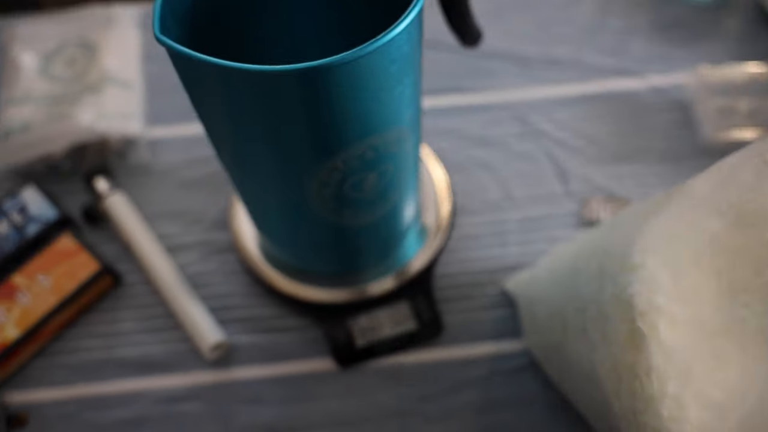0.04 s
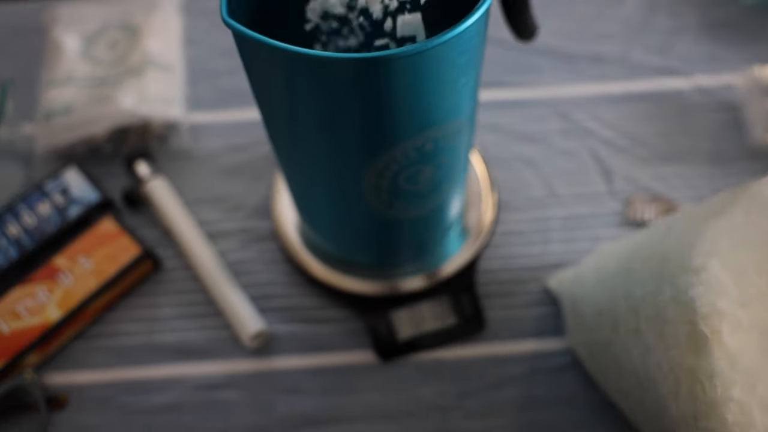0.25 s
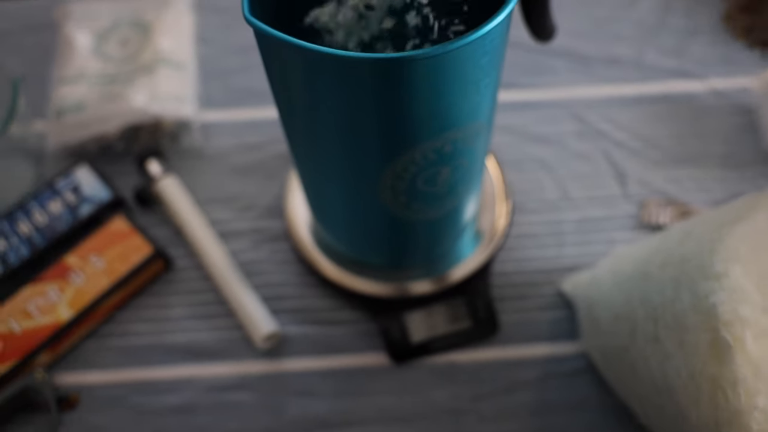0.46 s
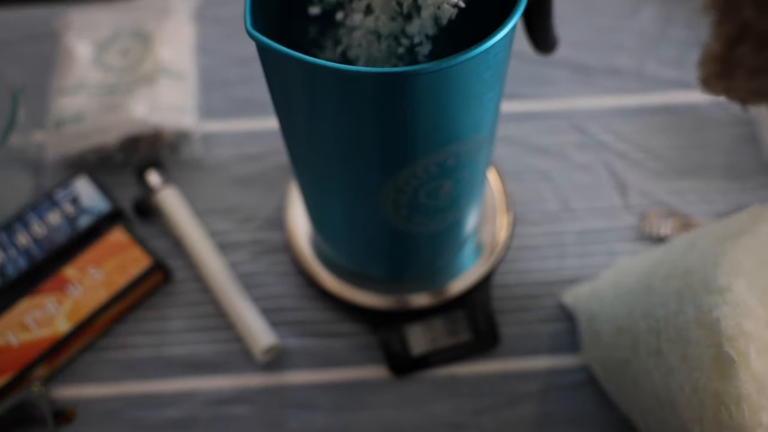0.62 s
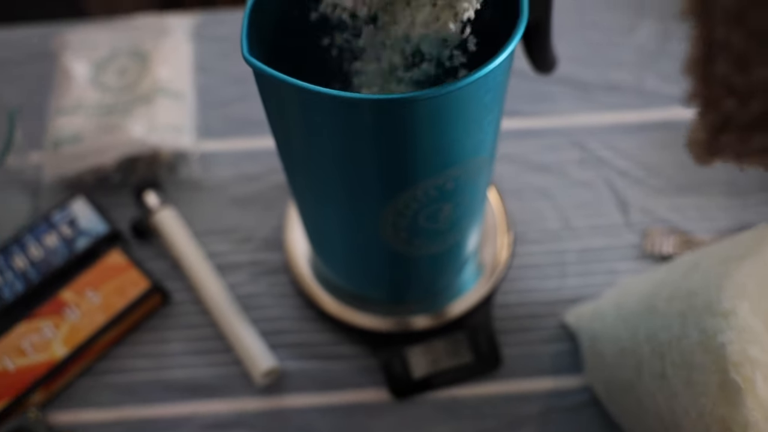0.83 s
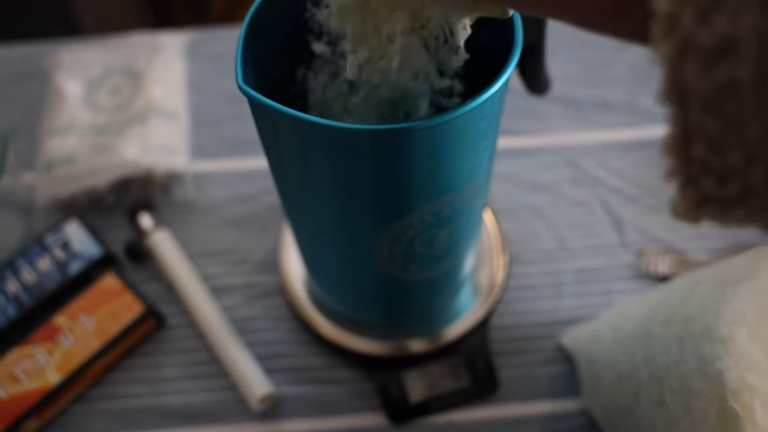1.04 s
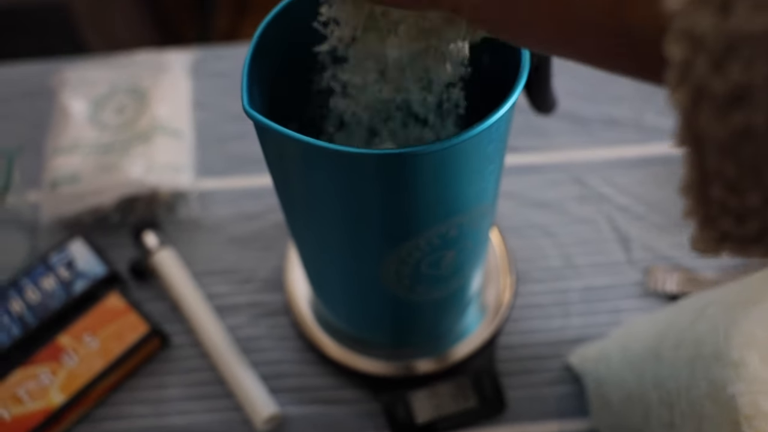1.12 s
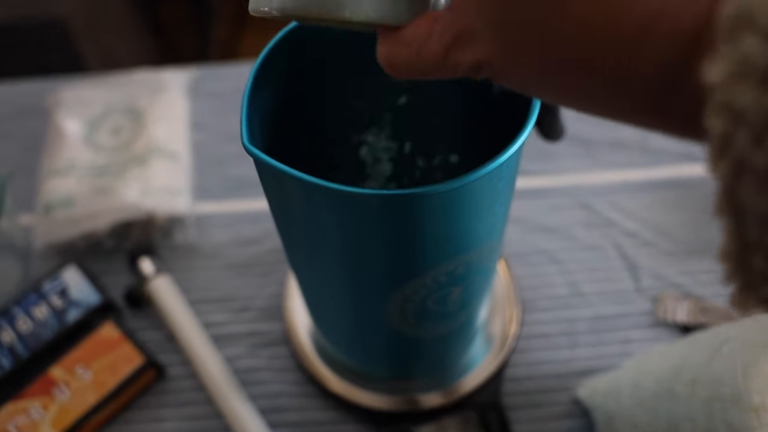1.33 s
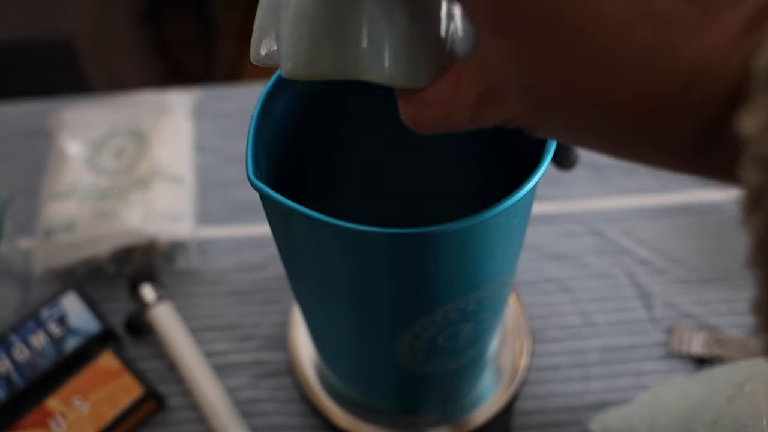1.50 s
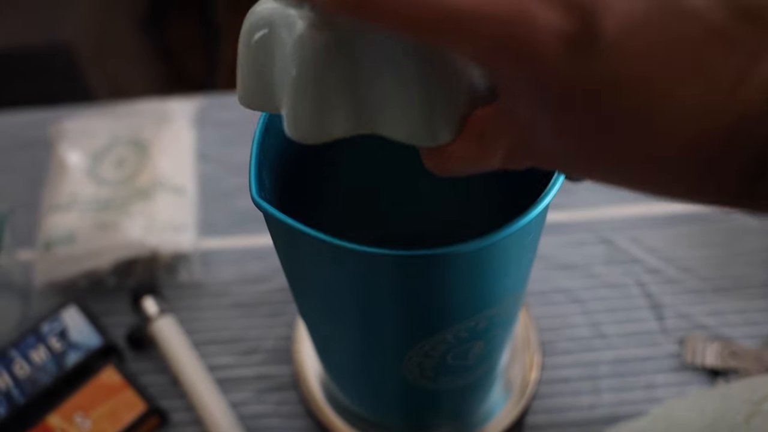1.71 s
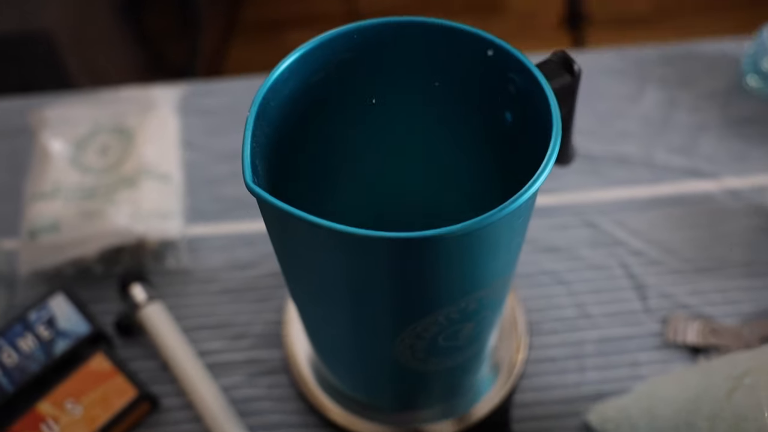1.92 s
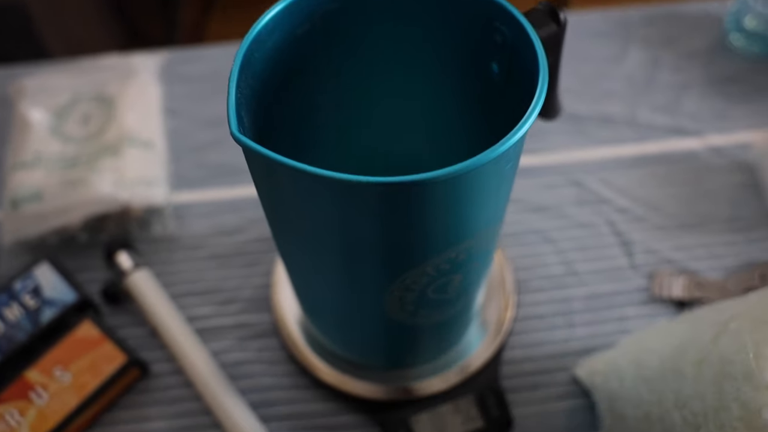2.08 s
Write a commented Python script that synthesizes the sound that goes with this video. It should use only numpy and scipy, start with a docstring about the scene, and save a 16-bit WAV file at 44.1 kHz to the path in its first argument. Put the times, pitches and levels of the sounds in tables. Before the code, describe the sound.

Hard wax flakes are poured into a metal pitcher in a quiet room. The first chunks clatter on the bare bottom with short metallic clinks, then smaller flakes patter in with a faint hollow note, ending in a few ticks.

```python
"""Wax flakes poured into a metal pitcher

In a quiet room, hard wax falls into a pitcher on a table. The first chunks strike the bare base and
excite the metal's normal modes. A stream of small flakes follows, and the growing heap lowers and
damps the ring. The air in the pitcher resonates with a hollow note; a few stragglers tick in last."""
import sys
import numpy as np
from scipy import signal
from scipy.io import wavfile
from scipy.ndimage import uniform_filter1d, minimum_filter1d

SR = 44100
rng = np.random.default_rng(int(sys.argv[2]) if len(sys.argv) > 2 else 0)


def dump(signal):
    """Clip the signal to [-1, 1] and save it as 16-bit WAV at the path in sys.argv[1]."""
    limited = np.clip(np.atleast_2d(signal).T, -1, 1)
    pcm = np.round(limited * 32767).astype(np.int16)
    wavfile.write(sys.argv[1], SR, pcm)


N = 94815
T = np.arange(N) / SR


def amp(db):
    """Amplitude ratio of a level in decibels."""
    return 10 ** (np.asarray(db) / 20)


def unit_rms(x):
    """Normalisation to unit mean power."""
    return x / np.sqrt(np.mean(abs(x) ** 2) + 1e-20)


def envelope(times, db):
    """Amplitude envelope, linear in decibels between points and silent outside them."""
    return amp(np.interp(T, times, db, left=-np.inf, right=-np.inf))


def add(mix, start_s, sound):
    """Superposition of a sound on the mix from a given time."""
    part = mix[max(round(start_s * SR), 0):][:len(sound)]
    part += sound[:len(part)]


def colour(x, spectrum, size=4096):
    """Minimum-phase filtering at unit energy, with a 12 dB per octave roll-off below the first point."""
    points_hz, db = np.transpose(spectrum)
    hz = np.fft.rfftfreq(size, 1 / SR) + 1
    rolloff_db = np.clip(12 * np.log2(hz / points_hz[0]), -40, 0)
    log_gain = np.log(amp(np.interp(np.log(hz), np.log(points_hz), db) + rolloff_db))
    mirrored = np.concatenate([log_gain, log_gain[-2:0:-1]])
    response = np.exp(np.conj(signal.hilbert(mirrored)))
    taps = np.fft.ifft(response).real[:size // 2]
    return signal.oaconvolve(x, taps / np.linalg.norm(taps))[:len(x)]


def resonate(force, hz, width_hz):
    """Complex response of a driven, damped oscillator whose natural frequency may glide."""
    phasor = np.exp(2j * np.pi * np.cumsum(hz * np.ones(N)) / SR)
    pole = np.exp(-np.pi * width_hz / SR)
    return phasor * signal.lfilter([1], [1, -pole], force / phasor + 1e-18)


# Spectrum of the room noise. Each row: frequency in Hz, relative spectral density in dB.
NOISE_SPECTRUM = [(15, -49.5), (25, -25), (53, -21.5), (137, -15.5), (242, -4.5), (293, -12), (363, -4.5),
                  (427, -13.5), (489, -3), (591, -15), (641, -12), (1020, -4.5), (1330, -15.5),
                  (3160, -15.5), (6740, -27.5), (10100, -35), (16000, -38.5)]
# Resonances driven by the room noise. Each row: frequency in Hz, bandwidth in Hz, level in dB.
NOISE_RESONANCES = [(336, 42, -53.5), (507, 34, -54)]


def room_noise(level_db=-50):
    """Stationary low noise, with two soft resonances sustained by random excitation."""
    tones = sum(amp(db) * unit_rms(resonate(rng.standard_normal(N), hz, width_hz).imag)
                for hz, width_hz, db in NOISE_RESONANCES)
    broadband = colour(rng.standard_normal(2 * N), NOISE_SPECTRUM)[N:]
    return amp(level_db) * unit_rms(broadband) + tones


# Growth of the heap. Each row: time in seconds, covered fraction of the base from 0 to 1.
HEAP_GROWTH = [(0.43, 0.05), (0.50, 0.25), (0.72, 0.55), (1.05, 1)]


def cover(time_s):
    """Accumulation: the fraction of the base that lies under wax at a given time."""
    return np.interp(time_s, *np.transpose(HEAP_GROWTH))


# Normal modes of the pitcher. Each row: frequency in Hz, level with the base bare in dB, level with
# it covered in dB, unloaded time to decay by 60 dB in seconds, coupling to the heap from 0 to 1.
PITCHER_MODES = [(1217, -29, -22.5, 0.27, 0), (2289, -19.5, -25.5, 0.16, .2), (3010, -16, -6, 0.14, .1),
                 (3070, -10, -6, 0.12, 0.03), (3216, -26, -3.5, 0.087, 0.3), (3310, -17, -15, 0.093, 0.5),
                 (3362, 0, -5, 0.093, 0.88), (3443, -16.5, -19.5, 0.13, 0.95), (4287, -20, -7, 0.2, .1),
                 (4704, -10.5, -37, 0.14, 0.8), (4943, -7.5, -14, 0.037, 0.77), (5690, -20, -43, 0.19, 0.7),
                 (6375, -15, -9, 0.12, 0.8), (8380, -11, -17, .065, 0.77)]


def loaded_modes(time_s, pitch_sag=0.035, heap_damping=1.5):
    """Mass loading and damping: each mode's frequency, level and decay time under the growing heap."""
    hz, bare_db, covered_db, t60, coupling = np.transpose(PITCHER_MODES)[:, :, None]
    covered = cover(time_s)
    load = coupling * covered
    db = bare_db + (covered_db - bare_db) * covered
    return hz * (1 - pitch_sag * load), db, t60 / (1 + heap_damping * load)


def clang(start_s, scatter_db=3, wall_damping=0.45):
    """Free vibration after a blow: the point of impact sets the strength and sign of the modes."""
    hz, db, t60 = loaded_modes(start_s)
    t = T[:6000]
    spot, side = 2 * rng.random((2, len(hz), 1)) - 1
    onset_db = db + scatter_db * spot * (db < db.max())  # the strongest mode keeps its level
    decay_db = 60 * t / t60 * (1 + wall_damping * cover(start_s))  # the heap damps all modes further
    return (amp(onset_db - decay_db) * np.sign(side) * np.sin(2 * np.pi * hz * t)).sum(0)


def impact(decay_s, echo_db, snap_db, rise_s=0.00039, echo_s=0.017):
    """Impact transient: an impulse at first contact, a noise burst and its echo between the walls."""
    t = T[:4096]
    attack = 1 - np.exp(-t / rise_s)
    decay = np.hypot(np.exp(-t / decay_s), amp(echo_db) * np.exp(-t / echo_s))  # powers add
    snap = amp(snap_db) * np.sqrt(decay_s * SR / 2) * rng.choice([-1, 1]) * (t == 0)
    return snap + rng.standard_normal(len(t)) * attack * decay


def in_pitcher(x, spectra):
    """Spectral shaping of impacts, crossfading from the bare base to the covered one."""
    spectra, covered = np.array(spectra), cover(T)
    return colour(x * (1 - covered), spectra[:, [0, 1]]) + colour(x * covered, spectra[:, [0, 2]])


# Spectra of an impact's low knock, middle clack and bright crack. Each row: frequency in Hz,
# relative level with the base bare in dB, relative level with it covered in dB.
KNOCK_SPECTRA = [(82, -35, -10.5), (200, -30, -18), (480, -15, -7), (588, -15.5, -8), (702, -2.5, 7),
                 (873, -2, 8.5), (964, -9.5, -4), (1145, 4.5, -15), (1370, -26, 0.5), (1523, -5.5, -13.5),
                 (1860, -1.5, 8.5), (2230, -13.5, -1.5), (2600, 0.5, 4.5), (2800, -21.5, -5),
                 (3970, -38, -23)]
CLACK_SPECTRA = [(1553, -43, -39.5), (2360, -11, -13), (2604, -14, -3), (3097, -12.5, 3), (3270, 2.5, -6),
                 (3555, -9.5, -0.5), (4086, -21, -5.5), (4300, -13.5, -3), (4590, -6, -13.5),
                 (4810, -42.5, -15.5), (6760, -37.5, -37)]
CRACK_SPECTRA = [(2560, -44.5, -26.5), (4450, 2.5, -3), (5080, -14.5, -1), (5630, 4.5, 4), (6200, 4, -1),
                 (7300, -1.5, 1.5), (7820, 1, 1), (10100, 1.5, -1.5), (13100, -3, -1.5),
                 (16200, -3.5, -8.5)]
# Landings of the larger pieces. Each row: start in seconds, then relative levels in dB of the ring
# (shared by clang and clack), the knock and the crack.
LANDINGS = [(0.226, -32.5, -49, -24.5), (0.2475, -14.5, -28.5, -18), (0.2578, -16.5, -41.4, -21.5),
            (0.3008, -32, -49, -32), (0.3139, -11, -40, -14), (0.3317, -15.5, -40.5, -13.5),
            (0.341, -9, -25.5, -20.3), (0.3482, -45, -28.5, -17), (0.3609, -7, -25.5, -27),
            (0.369, -10, -26, -12), (0.3802, -12, -31, -23.1), (0.3887, -18.5, -41, -26.2),
            (0.3995, -17.5, -52, -23), (0.412, -13, -38, -31), (0.423, -13, -36, -37),
            (0.4303, -9, -28.5, -23), (0.4696, -18.5, -42.5, -40), (0.4965, -21, -28, -25),
            (0.5074, -12.5, -23, -26.0), (0.521, -21, -35, -23), (0.5451, -53, -41, -24),
            (0.5539, -16, -28, -38), (0.5948, -23, -48, -30), (0.6161, -16, -49, -25.5),
            (0.6435, -13, -34.5, -17.5), (0.6668, -26.1, -52, -42), (0.681, -19, -24.5, -30.6),
            (0.705, -14, -26, -30), (0.7121, -13, -35, -17.5), (0.7394, -33, -50, -24.5),
            (0.7959, -17.5, -30.5, -45), (0.8062, -23, -37, -22), (0.8316, -29, -33, -44),
            (0.8481, -20.5, -30.5, -21), (0.8739, -22, -28, -22.5), (0.8881, -22, -47, -17.5),
            (0.9037, -20, -46, -24.5), (0.9138, -25, -58, -36.6), (0.9532, -15, -41, -18),
            (0.9735, -20, -62, -27.8), (1.0359, -22.9, -43.9, -32.0), (1.0526, -19, -33.5, -24.5),
            (1.0658, -39, -36, -27), (1.0826, -12, -46, -24.5), (1.1209, -20.5, -43, -32),
            (1.1672, -27, -32.5, -35.1), (1.1845, -19, -53, -29.3), (1.2127, -18, -47.0, -30),
            (1.2458, -35, -53, -21.5), (1.27, -20, -35, -34.2), (1.305, -22, -49, -45),
            (1.324, -23, -43, -29.5), (1.3809, -23, -51, -30), (1.419, -20, -49, -27),
            (1.4533, -40, -53, -29), (1.464, -28, -48.5, -27), (1.4883, -32, -53.8, -33),
            (1.5097, -23, -61, -25.5), (1.5493, -48.8, -55.6, -35.5), (1.564, -35.5, -58, -58),
            (1.6119, -42.5, -64, -42.5), (1.6675, -42.5, -55, -50.5), (1.7538, -45, -64, -41),
            (1.9741, -59.5, -62, -55), (1.9874, -59, -61, -63.7)]


def chunks(cushion_db=4, crumble_exponent=0.11):
    """Impulsive excitation: each larger piece gives a knock, a clack, a crack and a clang of the metal."""
    knock, clack, crack, ring = np.zeros((4, N))
    for start_s, ring_db, knock_db, crack_db in LANDINGS:
        covered = cover(start_s)
        add(knock, start_s, amp(knock_db + 2.5) * impact(decay_s=0.0057, echo_db=-13, snap_db=-1))
        add(clack, start_s, amp(ring_db - 6) * impact(decay_s=0.0048, echo_db=-15, snap_db=2))
        crumble_s = 0.0054 * amp(crack_db + 22.5) ** crumble_exponent  # bigger pieces crumble longer
        crumble = impact(crumble_s, echo_db=-10.5 + 1.5 * covered, snap_db=-9.5)
        add(crack, start_s, amp(crack_db + 3) * crumble)
        add(ring, start_s, amp(ring_db - cushion_db * covered) * clang(start_s))
    return (in_pitcher(knock, KNOCK_SPECTRA) + in_pitcher(clack, CLACK_SPECTRA)
            + in_pitcher(crack, CRACK_SPECTRA) + ring)


# Envelope of the hollow note. Each row: time in seconds, relative level in dB.
AIR_LEVELS = [(0.2, -81), (0.26, -45), (0.466, -42), (0.582, -29), (0.672, -48.5), (0.704, -27.5),
              (0.724, -28.5), (0.76, -37), (0.826, -29.5), (0.858, -38.5), (0.978, -31.5), (1.002, -53.5),
              (1.044, -30), (1.076, -29), (1.108, -49), (1.128, -31), (1.212, -44.5), (1.278, -32.5),
              (1.346, -43.5), (1.386, -33), (1.448, -54), (1.48, -39), (1.528, -54), (1.588, -54),
              (1.65, -79)]


def air_column(start_hz=355.3, fall_hz_per_s=8.9, width_hz=5.3, gain_db=-1.5):
    """Cavity resonance: the falling wax stirs the air in the pitcher into a hollow note."""
    air = resonate(rng.standard_normal(N), start_hz - fall_hz_per_s * T, width_hz)
    air /= uniform_filter1d(abs(air), size=600) ** 0.8  # evens out most of the random swell
    return amp(gain_db) * envelope(*np.transpose(AIR_LEVELS)) * unit_rms(air.real)


# Envelopes of the stream of flakes. Each row: time in seconds, then relative levels in dB of the
# bright crack, the ring and the low knock.
STREAM_LEVELS = [(0.30, -76, -67, -75), (0.335, -19.5, -32, -46), (0.39, -20, -41, -32),
                 (0.46, -26, -26, -44.5), (0.56, -30.5, -31.5, -34), (0.70, -24, -23, -32.5),
                 (0.82, -29, -33.5, -39.5), (0.89, -31.5, -26, -36.5), (1.0, -30, -31.5, -41.5),
                 (1.07, -28, -24.5, -45), (1.15, -28, -27.5, -43), (1.26, -28, -23.5, -49),
                 (1.36, -32.5, -34, -49), (1.43, -31.5, -30, -50), (1.50, -46, -33.5, -59),
                 (1.57, -52, -46.5, -62), (1.66, -75, -70, -83)]


def flake_stream(flakes_per_s=900, spread_db=2.5, shapes=16):
    """Shot noise: small flakes strike the heap and walls at random and drive the metal's modes."""
    strength = amp(spread_db * np.minimum(rng.exponential(1, N), 4))
    hits = strength * (rng.random(N) < flakes_per_s / SR)
    shape_of_hit = rng.integers(0, shapes, N)
    patter = np.zeros(N)
    for shape in range(shapes):
        tick = impact(decay_s=0.0016, echo_db=-17, snap_db=0)
        patter += signal.oaconvolve(hits * (shape_of_hit == shape), tick)[:N]
    patter = unit_rms(patter)
    metal = sum(amp(db) * unit_rms(resonate(patter, hz, np.log(1000) / np.pi / t60.mean()).imag)
                for hz, db, t60 in zip(*loaded_modes(T)))
    ring = amp(-3) * unit_rms(metal) + amp(-1.5) * in_pitcher(patter, CLACK_SPECTRA)
    times, crack_db, ring_db, knock_db = np.transpose(STREAM_LEVELS)
    return (envelope(times, crack_db) * in_pitcher(patter, CRACK_SPECTRA)
            + envelope(times, ring_db) * ring
            + envelope(times, knock_db) * in_pitcher(patter, KNOCK_SPECTRA))


def reverberation(x, level_db=-27.5, t60_s=0.3, delay_s=0.006, cutoff_hz=7000):
    """Diffuse reflections in the room form a faint, exponentially decaying tail."""
    t = T[:SR // 2]
    tail = rng.standard_normal(len(t)) * amp(-60 * t / t60_s) * (t > delay_s)
    tail = signal.lfilter(*signal.butter(1, cutoff_hz, fs=SR), tail)
    return amp(level_db) * signal.fftconvolve(x, tail / np.linalg.norm(tail))[:N]


def scene():
    """Superposition of the direct sound, its reverberation and the room noise in one channel."""
    direct = chunks() + flake_stream() + air_column()
    return (direct + reverberation(direct) + room_noise())[None]


def record(dry, window_samples=90, cutoff_hz=15800):
    """Peak limiting holds the loudest clangs at full scale; a low-pass filter then limits the band."""
    gain = 1 / np.maximum(abs(dry), 1)
    gain = uniform_filter1d(minimum_filter1d(gain, window_samples), window_samples)
    lowpass = signal.firwin(401, cutoff_hz, window=("kaiser", 8), fs=SR)
    return signal.oaconvolve(dry * gain, lowpass[None], "same")


dry = scene()
out = record(dry)
dump(out)
```